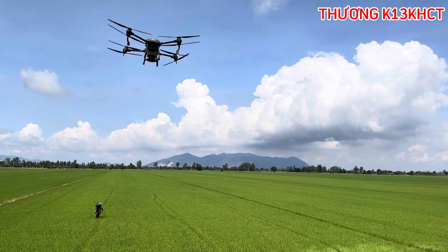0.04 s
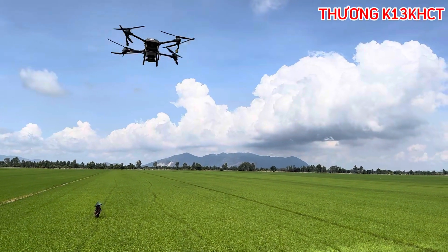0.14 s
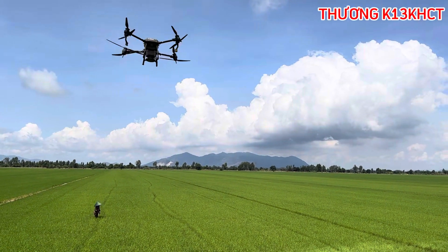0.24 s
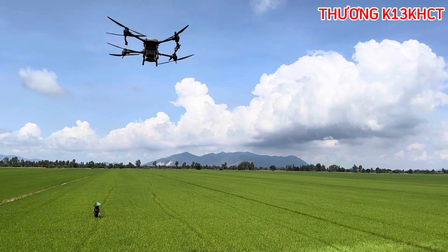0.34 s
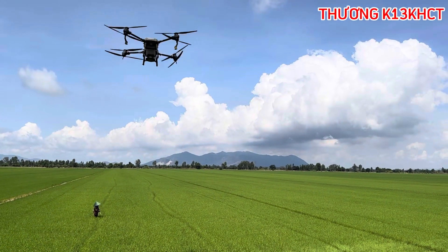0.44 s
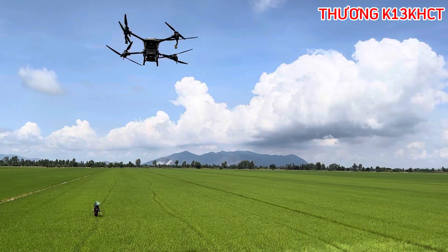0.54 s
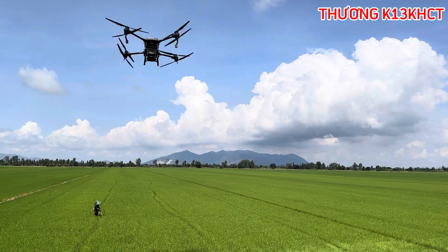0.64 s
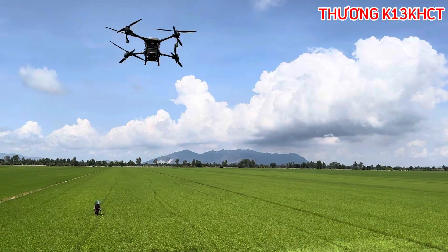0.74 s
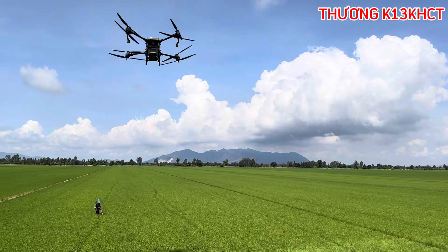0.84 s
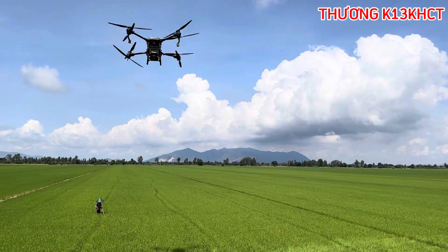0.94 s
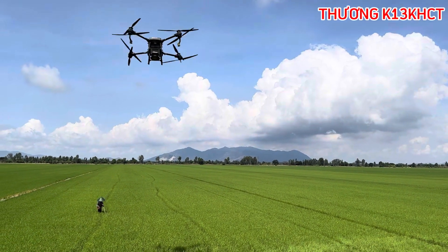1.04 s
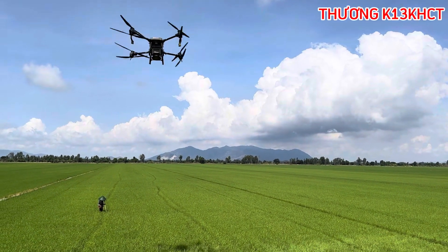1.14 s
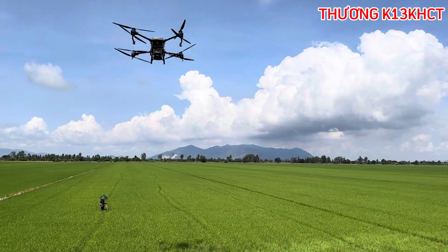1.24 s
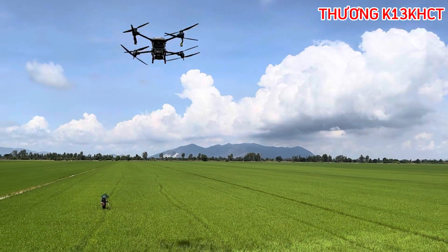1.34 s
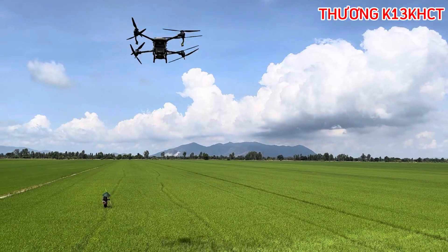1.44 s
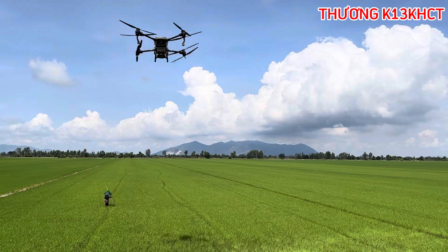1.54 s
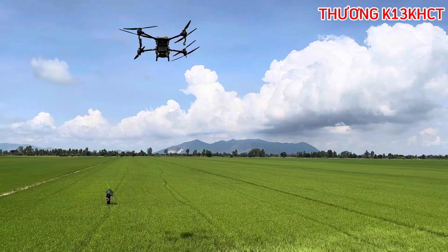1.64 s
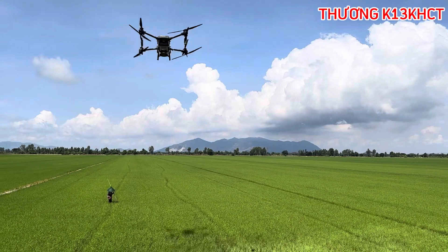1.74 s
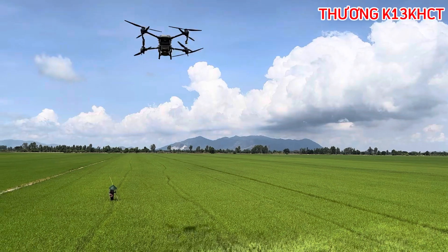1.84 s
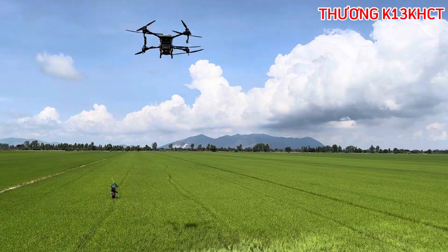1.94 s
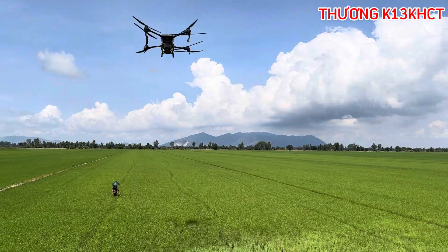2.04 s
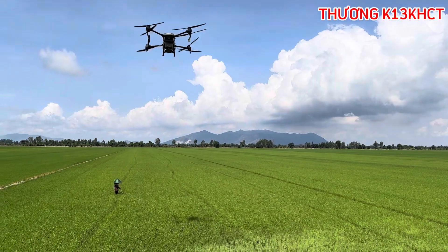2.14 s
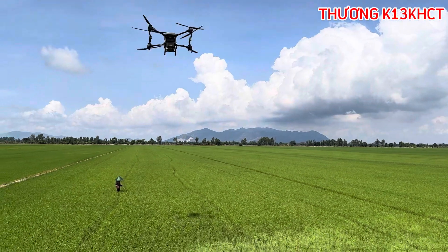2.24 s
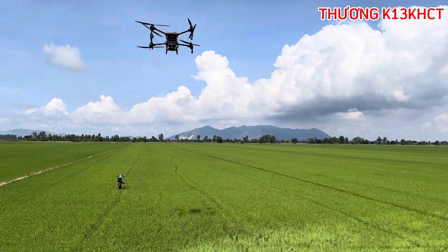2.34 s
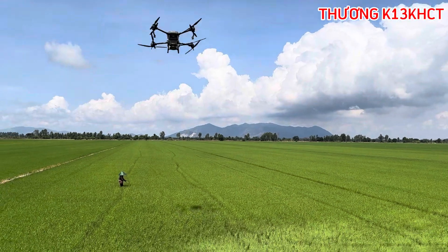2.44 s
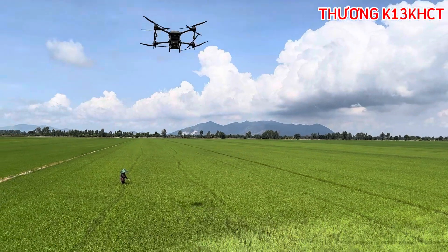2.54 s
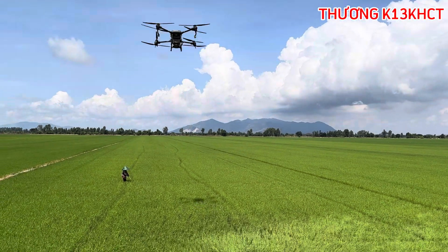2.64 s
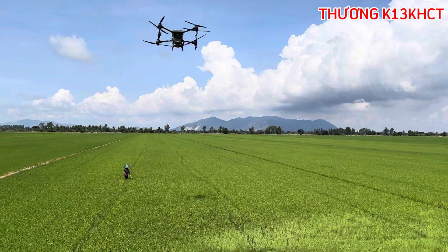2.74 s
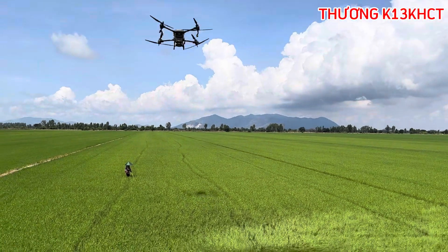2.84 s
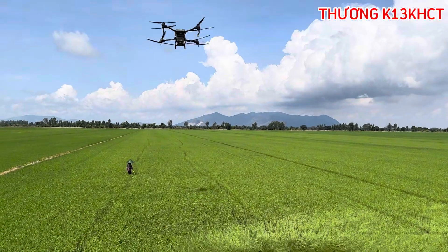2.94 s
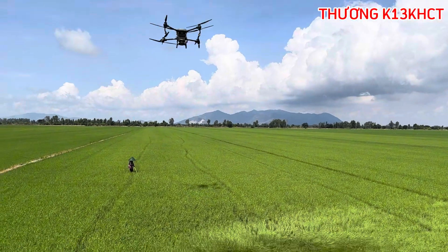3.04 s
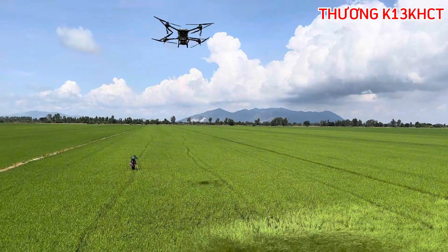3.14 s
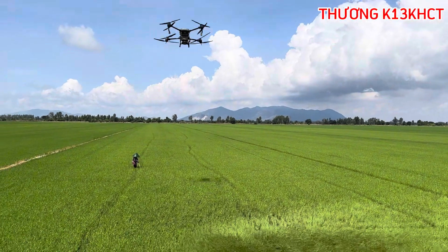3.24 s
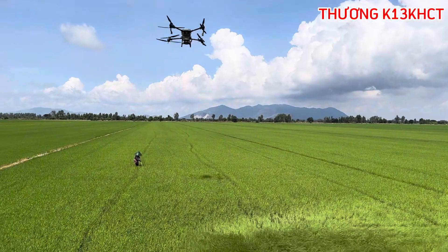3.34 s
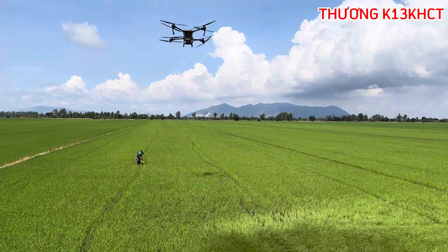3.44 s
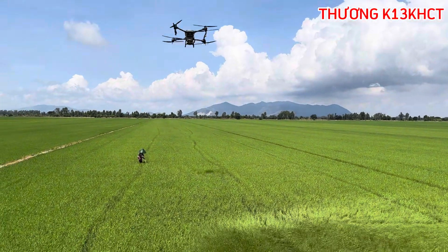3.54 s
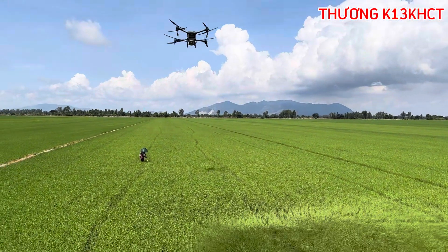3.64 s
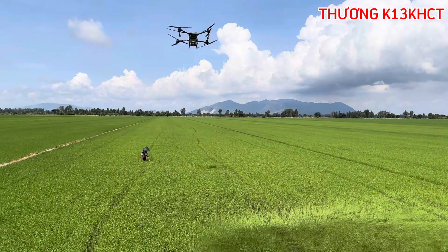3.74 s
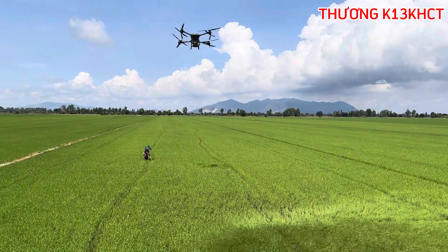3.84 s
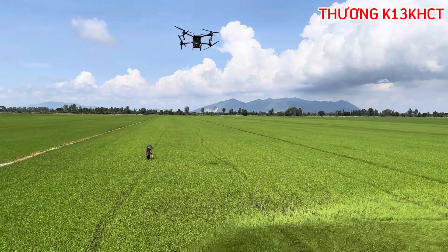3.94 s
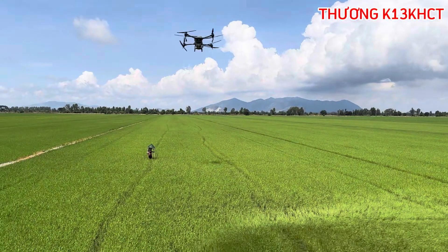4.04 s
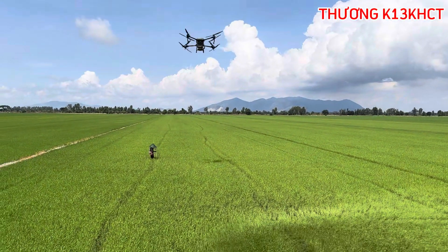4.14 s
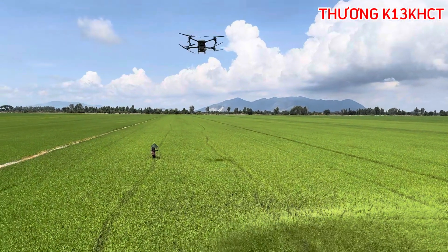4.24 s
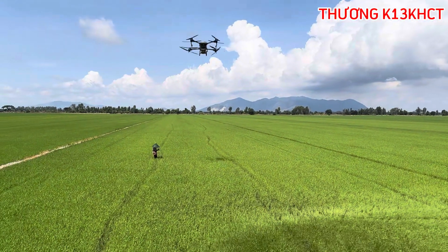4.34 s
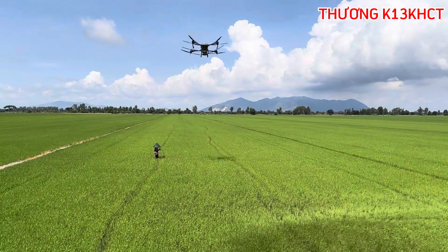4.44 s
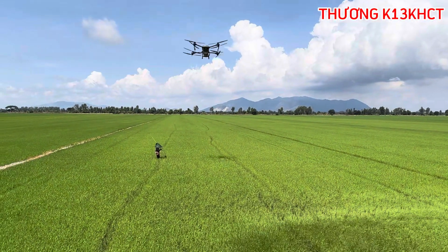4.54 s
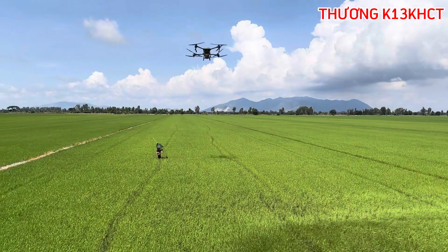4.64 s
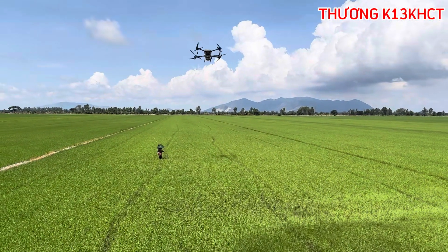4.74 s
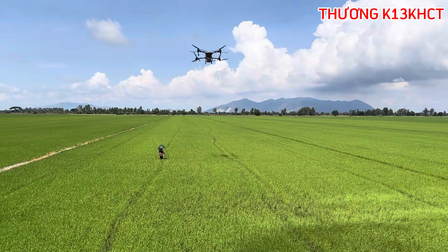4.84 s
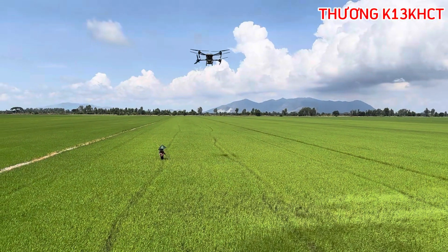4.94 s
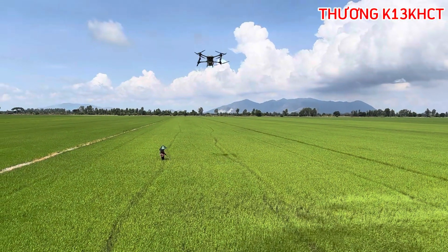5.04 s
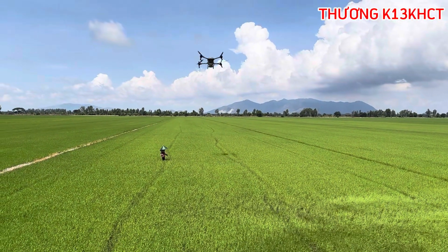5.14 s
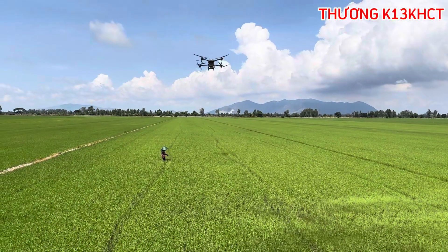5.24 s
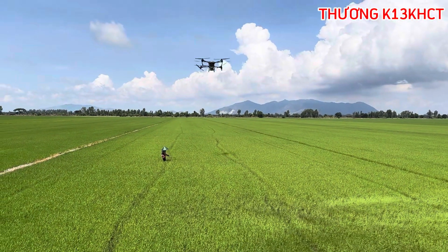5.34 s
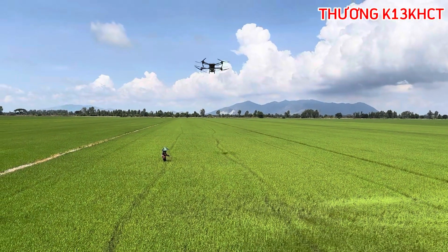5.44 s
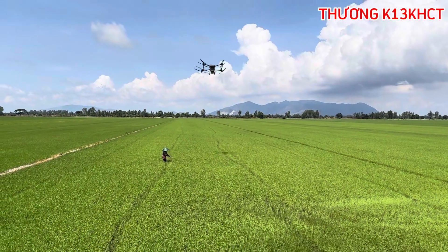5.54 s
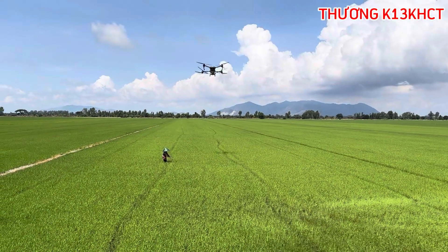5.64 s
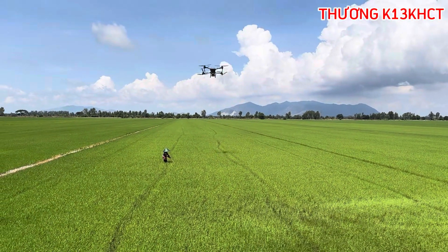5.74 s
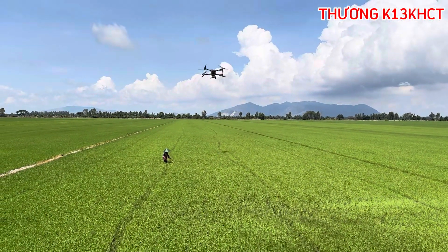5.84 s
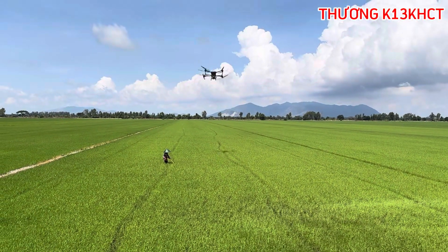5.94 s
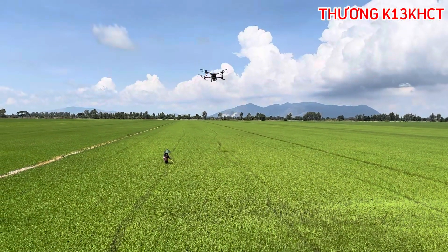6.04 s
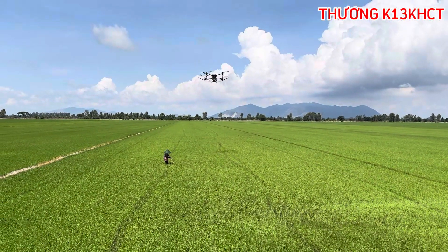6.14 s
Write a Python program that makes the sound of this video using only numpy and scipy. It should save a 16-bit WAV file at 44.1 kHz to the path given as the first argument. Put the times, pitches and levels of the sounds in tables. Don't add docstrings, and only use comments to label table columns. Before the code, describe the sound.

A phone in the open picks up a big drone flying low, nearest in the first second, then receding. Several rotor groups throb slightly out of tune beneath hissing, turbulent wash with a shifting, hollow ground echo. A nearby generator holds an unchanging low buzz with faint metallic rattle. Wind puffs bump the microphone; one short, dry leaf rustle comes at about 4.4 seconds.

```python
import sys
import numpy as np
from scipy import signal
from scipy.fft import irfft
from scipy.io import wavfile
from scipy.ndimage import uniform_filter1d

SR = 44100
rng = np.random.default_rng(int(sys.argv[2]) if len(sys.argv) > 2 else 0)


def persist_wave(psi):
    counts = np.round(np.clip(psi, -1, 1) * 32767).astype(np.int16)
    wavfile.write(sys.argv[1], SR, np.atleast_2d(counts).T)


def convert_level_to_amplitude(level_db):
    exponent = np.asarray(level_db, float) / 20
    return 10 ** exponent


N = 272979
TIME = np.arange(N) / SR
HZ = np.fft.rfftfreq(N, 1 / SR)
HALF = np.array([[.5], [-.5]])


def curves(table):
    s, *columns = np.transpose(table)
    return [np.interp(TIME, s, c) for c in columns]


def at(table, hz, column=1):
    table = np.transpose(table)
    return np.interp(np.log(hz), np.log(table[0]), table[column])


def walk(rate):
    hold = int(SR / rate)
    levels = np.repeat(rng.standard_normal(N // hold + 1), hold)
    return 1.13 * uniform_filter1d(levels, hold)[:N]


def band(hz, octaves, lead=0., side_db=-99):
    shape = np.exp(-.5 * (np.log2(HZ / hz + 1e-9) / octaves) ** 2)
    mid, side = shape * np.exp(2j * np.pi * rng.random((2, len(HZ))))
    spec = [mid, convert_level_to_amplitude(side_db) * side + 1j * np.tan(lead / 2) * mid]
    return irfft(spec, N) * N / np.sqrt(2 * np.sum(shape ** 2))


def distance():
    nearest_m, nearest_s, speed_m_s = 8, 0.846, 4
    return np.hypot(1, speed_m_s * (TIME - nearest_s) / nearest_m)


# (time [s], blade rate [Hz], level [dB])
NEAR_ROTORS = [(0, 46.93, -2), (.7, 47.03, 1), (1.0, 47.64, 6.5), (1.6, 47.2, -1.5), (2.2, 46.4, 3.5),
               (3.05, 46.1, -0.5), (3.5, 46.9, -3), (4.4, 46.8, -5.5), (5.2, 47.2, -2), (6.19, 46.6, -4)]
# (blade rate [Hz], its change on tilting [Hz], level [dB],
# fade [dB/s], beat period [s], loudest time [s])
FAR_ROTORS = [
    (47.8, 0.64, -4, -1.35, 2.9, 0.84),
    (53.3, -4.5, -3, -8, 1.5, -0.1),
    (40, -1, -15, -0.5, 1.23, -0.1),
]


def rotor_groups():
    tilt_s, tilt_lasts_s, beat_db = 1.15, 0.69, 4
    tilt = np.clip((TIME - tilt_s) / tilt_lasts_s, 0, 1)
    groups = [curves(NEAR_ROTORS)]
    for hz, change, db, fade, period, loudest_s in FAR_ROTORS:
        beat = beat_db * np.cos(2 * np.pi * (TIME - loudest_s) / period)
        groups.append((hz + change * tilt, db + fade * TIME + beat))
    return groups


# (multiple of the blade rate, then level [dB] for each of the four rotor groups)
BLADE = [(1, -45, -55, -40, -44), (2, -29, -34, -26, -27), (3, -35.5, -32, -41, -49),
         (4, -39, -34, -29, -41), (5, -45.5, -56, -57, -61), (6, -42.5, -37.5, -50, -53),
         (8, -43.5, -46.5, -59, -60), (9, -47.5, -48, -43, -48), (10, -47, -50, -50, -61),
         (11, -46.5, -46, -58, -56)]
# (time [s], depth [0-1])
CHOP = [
    (0, .15),
    (3.2, .2),
    (4.3, .35),
    (5.2, .8),
    (6.19, .3),
]


def rotors():
    tones, phases = 0, []
    for group, (hz, db) in enumerate(rotor_groups()):
        turns = np.cumsum(hz * (1 + 0.0019 * walk(4.005))) / SR + rng.random()
        phases.append(2 * np.pi * turns)
        for k, *tone_db in BLADE:
            fade_db = .2 * max(k - 5, 0) * TIME
            level_db = tone_db[group] + db - fade_db + (1.2 + .15 * k) * walk(6)
            wave = np.sin(k * phases[-1] + 0.13 * k * walk(8) + k * k)
            tones = tones + convert_level_to_amplitude(level_db) * np.sqrt(2) * wave
    near = np.cos(phases[0]) + 0.42 * np.cos(2 * phases[0])
    return tones, curves(CHOP)[0] * near + 0.063 * np.cos(phases[2])


# (frequency [Hz], level [dB per Hz])
WASH_COLOUR = [(40, -28), (70, 5.5), (130, 7), (250, -1), (450, 1), (1050, 0.5), (1600, -4), (2500, -1.5),
               (4000, -1.5), (6300, -4.5), (8000, -17), (10000, 2), (12700, 5.5), (16200, 4)]
# (frequency [Hz], side minus mid [dB], left minus right [dB], left lead [rad])
PORT = [(60, -18, 0, 0.42), (200, -16, -3, 0.092), (400, -13, -2, 0.21), (700, -10.5, 0, .3),
        (1300, -9, -0.7, 0.55), (1800, -5, 1, 0.61), (2500, -7, 3.5, .1), (3200, -7, -1, -0.57),
        (4360, -9, 1, 0.46), (6500, -2, -3.5, .2), (8200, 2.5, 2, 1.37), (15000, -9.5, 0.5, 1.2)]
# (time [s], level [dB])
LOAD = [(0, 0), (.3, -0.5), (.6, 0.9), (1.1, -1), (1.4, -0.9), (1.75, -2), (2.0, -1.4), (2.6, -2.5),
        (3.0, -1.9), (3.5, 1.1), (3.9, 0.5), (4.2, -0.3), (4.5, 0.5), (5.0, -1.4), (6.19, -0.7)]
# (level [dB], share of the loss with distance, share of the load)
ZONES = [
    (-24.5, 1.02, 1.1),
    (-30.5, 0.75, .6),
    (-44, 0.96, .6),
]


def wash(chop):
    loss_db, load_db = 20 * np.log10(distance()), curves(LOAD)[0]
    body_db, hiss_db, top_db = (db - spread * loss_db + share * load_db for db, spread, share in ZONES)
    own_flicker = [(300, 0.74), (3000, 1.27), (7000, 1.1), (12000, 2.0)]  # (Hz, dB)
    out, swell, shared = 0, walk(3.1), walk(23)
    for hz in 40 * 2 ** (np.arange(27) / 3):
        to_hiss = np.clip(np.log2(hz / 1600) / 0.93, 0, 1)
        to_top = np.clip(np.log2(hz / 8500) / .2, 0, 1)
        shared = 0.62 * shared + 0.2 * walk(14)
        flicker = 0.11 * swell + .5 * shared + at(own_flicker, hz) * walk(22)
        lower_db = body_db + to_hiss * (hiss_db - body_db)
        db = (1 - to_top) * lower_db + to_top * top_db + flicker
        zone_hz = 1200 + 2400 * to_hiss - 1600 * to_top
        density = at(WASH_COLOUR, hz) + 10 * np.log10(hz / 5.15 / zone_hz)
        mid, side = band(hz, octaves=0.22, lead=at(PORT, hz, column=3), side_db=at(PORT, hz))
        gate = np.maximum(1 + chop * min(hz / 900, 1, 3500 / hz) / 2, .05)
        pair = np.array([mid + side, mid - side]) * convert_level_to_amplitude(at(PORT, hz, column=2) * HALF)
        out = out + convert_level_to_amplitude(db + density) * gate * pair
    pan_db = -.4 - .25 * TIME
    return out * convert_level_to_amplitude(pan_db * HALF)


def ground(x):
    echo_ms, echo_gain, dull_hz = 12.6, 0.44, 1020
    bank_s, bank_lasts_s, bank_gain = 5.43, 0.39, 0.36
    lag_s = echo_ms / distance() / 1000
    bank = bank_gain * np.exp(-.5 * ((TIME - bank_s) / bank_lasts_s) ** 2)
    centre = x.mean(axis=0)
    below = centre + 0.46 * (x - centre)
    dull = signal.sosfilt(signal.butter(1, dull_hz, fs=SR, output="sos"), below)
    for share, gain in ((0.97, echo_gain), (0.6035, bank)):
        x = x + gain * np.array([np.interp(TIME - share * lag_s, TIME, c) for c in dull])
    return x


# (multiple of the firing rate, level [dB], left minus right [dB], left lead [rad], waver [dB])
EXHAUST = [(1, -31, 1, -.05, 1.5), (2, -24, -1.2, 0.26, 0.14), (3, -34, -2, 0.49, 1),
           (4, -35, 2, 0.023, 1.5), (8, -50.5, 16, 0.24, -0.5)]
# (frequency [Hz], width [Hz], level [dB])
CASING = [(1040, 150, -8), (2070, 65, -4), (3130, 49, -5.5), (3720, 210, -4.5), (5660, 270, -7)]


def generator():
    firing_hz, casing_db = 85.915, -47.5
    phase = 2 * np.pi * firing_hz * TIME
    tones = 0
    for k, db, pan_db, lead, waver_db in EXHAUST:
        level = convert_level_to_amplitude(db + pan_db * HALF + waver_db * walk(3))
        tones = tones + level * np.sqrt(2) * np.sin(k * phase + lead * HALF + .45 * k * k)
    casing = sum(convert_level_to_amplitude(db) * band(hz, width / hz)[0] for hz, width, db in CASING)
    return tones + convert_level_to_amplitude(casing_db) * (1 + 0.16 * np.cos(phase)) * casing


# (frequency [Hz], width [Hz], level [dB])
LEAVES = [(3120, 280, -47), (3860, 300, -42.5), (4640, 220, -43.5), (6900, 680, -44)]


def rustle():
    start_s, end_s, tail_end_s = 4.33, 4.5, 4.72
    swell = np.clip((TIME - start_s) / 0.055, 0, 1)
    stop = np.clip((end_s - TIME) / 0.011, 0.29 * (TIME < tail_end_s), 1)
    leaves = sum(convert_level_to_amplitude(db + 1.4 * walk(80)) * band(hz, width / hz / 2)[0] for hz, width, db in LEAVES)
    return swell * stop * leaves


def thump(s, db, hz, cycles):
    t = np.arange(-2000, 2000) / SR
    wave = np.sin(2 * np.pi * hz * t * (1 - 6 * t))
    for k in (1.5, 2.1):
        wave = wave + 0.5 * np.sin(2 * np.pi * (k * hz * t + rng.random()))
    out = np.zeros(N + len(t))
    start = int(s * SR)
    out[start:start + len(t)] = convert_level_to_amplitude(db) * wave * np.exp(-.5 * (t * hz / cycles) ** 2)
    return out[len(t) // 2:][:N]


# (time [s], level [dB])
BREEZE = [(0, -23), (.4, -36), (.85, -27), (1.15, -41), (1.32, -33), (1.7, -46), (2.3, -46), (2.7, -36),
          (3.1, -30), (3.7, -33), (5.2, -29.5), (6.19, -30.5)]
# (time [s], peak level [dB], frequency [Hz], side struck [+1 or -1])
PUFFS = [(0.08, -27, 125, 1), (0.142, -34, 122, -1), (0.233, -16.5, 160, 1), (0.298, -36, 86, 1),
         (0.546, -25, 118, -1), (0.65, -25, 144, 1), (0.826, -18, 196.2, 1), (1.1, -30, 83, 1),
         (1.267, -32, 68.5, 1), (3.068, -33, 77, 1), (3.157, -32, 83.4, -1), (3.282, -33, 88, 1),
         (3.401, -28, 85.1, 1), (3.68, -32, 104, 1), (4.523, -28, 126, 1), (4.642, -30, 103.6, 1),
         (4.853, -30, 71.56, 1), (5.059, -29, 120.3, 1), (5.128, -32, 103.5, 1), (5.403, -22, 109, 1),
         (5.544, -29, 82.1, 1), (5.891, -25.7, 90, 1)]
# (time [s], peak level [dB], frequency [Hz])
GUSTS = [
    (.157, -15, 95),
    (.765, -19, 100),
    (3.285, -21, 80),
    (5.464, -14, 88),
    (5.482, -15, 66),
    (6.076, -21, 70),
]


def wind():
    rumble = convert_level_to_amplitude(curves(BREEZE)[0])
    mid = convert_level_to_amplitude(-0.5 + 2.7 * walk(9)) * rumble * band(58, octaves=0.76)[0]
    side = convert_level_to_amplitude(-8.0 + 3.1 * walk(14)) * (rumble + convert_level_to_amplitude(-47)) * band(69, octaves=0.93)[0]
    for s, db, hz, struck in PUFFS:
        puff = thump(s, db + 0.5, hz, cycles=0.85)
        side = side + puff
        mid = mid + 0.21 * np.sign(struck) * puff
    for s, db, hz in GUSTS:
        mid = mid - thump(s, db, hz, cycles=.55)
    return np.array([mid + side, mid - side])


# (silent in [0 sum, 1
# difference], low edge [Hz], its wander [Hz], high edge [Hz], its wander [Hz])
SILENT_BANDS = [(0, 8280, 850, 9660, 250), (0, 12400, 500, 13800, 450), (1, 9700, 700, 11650, 550),
                (1, 15100, -1300, 23000, 0), (0, 15750, 0, 23000, 0)]
# (row of SILENT_BANDS, start [s], end [s], 1 if the difference falls
# silent above 11 kHz meanwhile)
RETURNS = [(0, .42, .48, 0), (0, .59, .63, 0), (0, 1.34, 1.39, 0), (0, 1.56, 1.71, 0), (0, 2.5, 2.53, 0),
           (0, 2.83, 2.93, 0), (0, 2.97, 3.02, 0), (0, 3.6, 3.65, 0), (1, .31, .39, 0), (1, .93, 1.03, 1),
           (1, 1.61, 1.69, 0), (1, 4.47, 4.57, 1), (1, 5.01, 5.14, 1), (1, 5.99, 6.15, 1)]


def treble_gaps(x):
    pad = 192
    pair = np.pad(np.array([x[0] + x[1], x[0] - x[1]]) / 2, ((0, 0), (pad, 0)))
    hz, s, spec = signal.stft(pair, SR, nperseg=2048, noverlap=1024)
    hz, s = hz[:, None], s - pad / SR
    for row, (which, lo, lo_wander, hi, hi_wander) in enumerate(SILENT_BANDS):
        steps = np.repeat(rng.integers(0, 4, (2, len(s))) / 3, 2, axis=1)[:, :len(s)]
        gone = (hz > lo + lo_wander * steps[0] ** 3) & (hz < hi + hi_wander * steps[1] ** 4)
        for back, start_s, end_s, swap in RETURNS:
            if back == row:
                now = (s > start_s) & (s < end_s)
                gone[:, now] = False
                spec[1, :, now] *= 1 - swap * (hz.T > 11000)
        spec[which] *= ~gone
    mid, side = signal.istft(spec, SR, nperseg=2048, noverlap=1024)[1][:, pad:pad + N]
    return np.array([mid + side, mid - side])


def scene():
    tones, chop = rotors()
    return tones + ground(wash(chop)) + generator() + rustle() + wind()


def top_cut(x):
    return signal.sosfilt(signal.butter(12, 16760, fs=SR, output="sos"), x)


def record(dry):
    bass_cut = signal.butter(3, 42, "high", fs=SR, output="sos")
    mix = treble_gaps(signal.sosfilt(bass_cut, dry))
    return top_cut(mix)


dry = scene()
out = record(dry)
persist_wave(out)
```